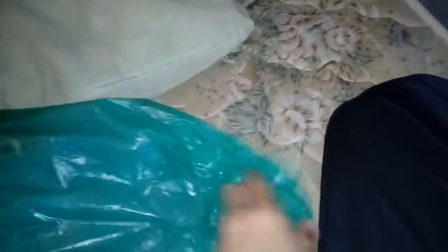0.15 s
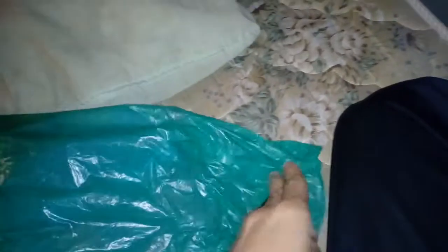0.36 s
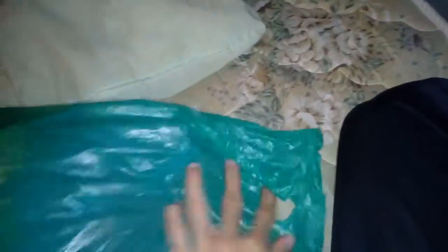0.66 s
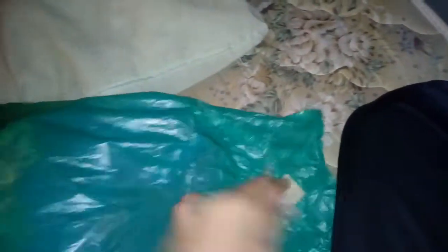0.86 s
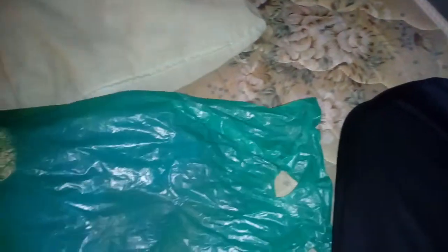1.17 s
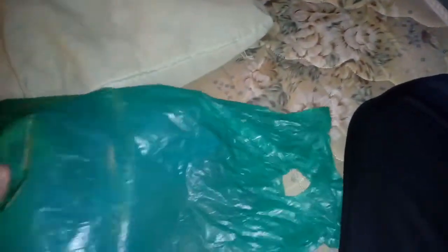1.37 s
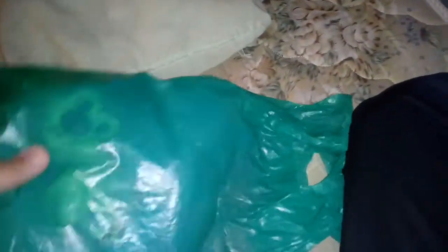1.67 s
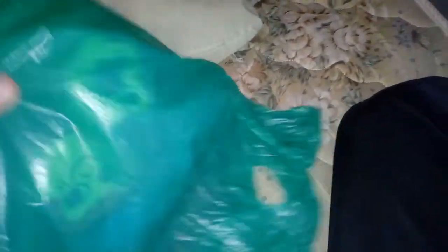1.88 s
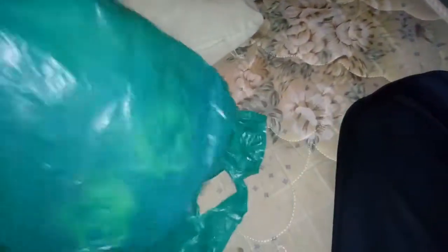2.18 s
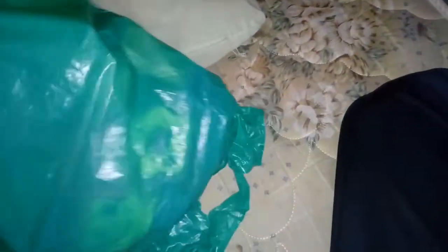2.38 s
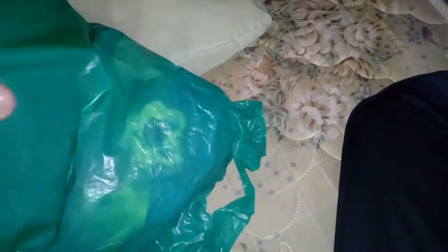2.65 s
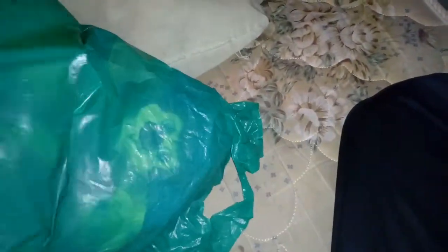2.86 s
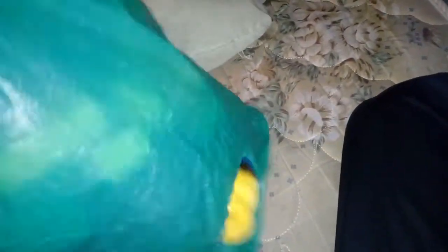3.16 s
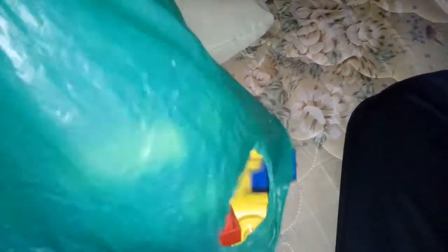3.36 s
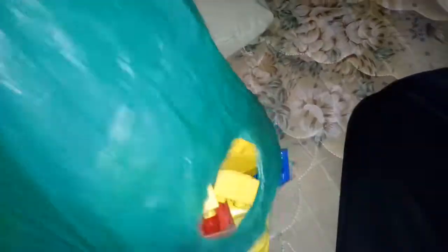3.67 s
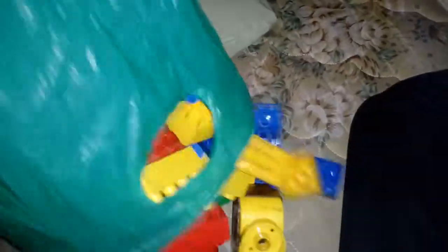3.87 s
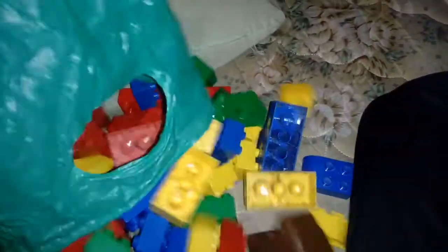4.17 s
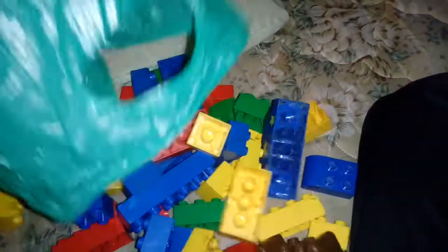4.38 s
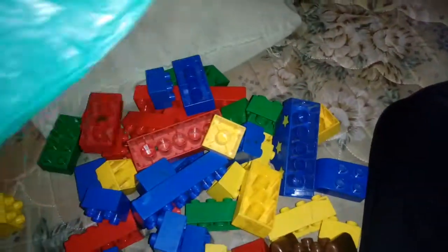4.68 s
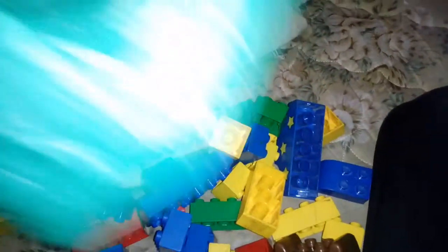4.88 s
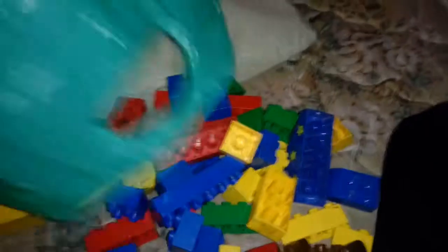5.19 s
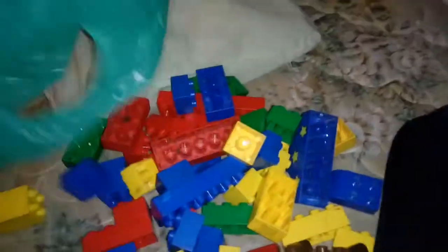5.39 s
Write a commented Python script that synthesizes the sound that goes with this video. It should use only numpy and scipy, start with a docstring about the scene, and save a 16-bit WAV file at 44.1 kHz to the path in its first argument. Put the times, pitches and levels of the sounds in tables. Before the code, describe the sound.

Very close, bright rattling of hollow plastic blocks in a rustling bag, swelling into a pouring rush before thinning to bag rustle and last sharp clacks.

```python
"""Hollow toy bricks clatter in a thin plastic bag handled on a bed, close to a phone microphone, in a small soft room.
Each brick is a set of damped wall modes, with lower ringing from the air in its open underside.
The film is filtered noise: crowds of tiny pops for crinkle, single bursts for snaps, low noise for drag on the cover.
Low background noise lies under everything, and a short decaying noise tail is the room.
The phone's limiter holds the clacks down, and the sharpest ones clip."""
import sys
import numpy as np
from scipy import signal
from scipy.fft import rfft, irfft
from scipy.io import wavfile
from scipy.ndimage import uniform_filter1d, minimum_filter1d

SR = 44100
rng = np.random.default_rng(int(sys.argv[2]) if len(sys.argv) > 2 else 0)


def int16_out(signal):
    """Quantize to a 16-bit WAV file."""
    q = np.round(np.clip(np.atleast_2d(signal).T, -1, 1) * 32767)
    wavfile.write(sys.argv[1], SR, q.astype(np.int16))


N = 244310
TIME = np.arange(N) / SR
RING = TIME[:int(.12 * SR)]  # time axis of one blow

# the load shifts and its bricks tumble, then settle:
# [start t/s, length/s, relative wall level/dB, hollows against walls/dB]
SHIFTS = [(0.0, 0.15, -20, -14), (0.198, 0.099, -15, -15), (0.366, 0.021, -23, -13),
          (0.491, 0.061, -17, -12), (0.596, 0.12, -20.5, -9.5), (0.923, 0.16, -24.5, -7),
          (1.261, 0.028, -18.5, -12), (1.31, 0.048, -19.5, 5), (1.355, 0.037, -13.5, -13),
          (1.418, 0.3, -15.5, -8), (1.743, 0.18, -22.5, -12), (1.884, .025, -17, -7),
          (1.911, 0.041, -9, -13), (2.002, .11, -9, -15.5), (2.13, .02, -11, -19),
          (2.167, 0.067, -11.5, -16), (2.266, .11, -15, -12), (2.396, 0.17, -18, -14.5),
          (2.568, 0.025, -22.5, -3.5), (2.647, 0.089, -17.5, -14.5), (2.779, 0.042, -20.5, -4),
          (2.84, .1, -26, -26), (2.96, 0.24, -12, -13), (3.227, 0.18, -11, -14), (3.428, 0.25, -14, -15.5),
          (3.703, .07, -16.5, -8), (3.752, 0.15, -11, -19.5), (3.928, 0.2, -11, -24.5),
          (4.129, 0.22, -15, -18.5), (4.375, 0.057, -15, -11), (4.48, 0.068, -20, -14),
          (4.576, 0.018, -18.5, -13), (4.64, 0.096, -42, -9), (4.975, 0.25, -27, -3),
          (5.306, 0.16, -26.5, -37), (5.502, 0.03, -21, -32)]
# bending modes of a brick's walls, before detuning: [f/Hz, level/dB, t60/s]
WALL_MODES = [(1854, 2, 0.018), (2135, -4, 0.072), (2521, -2, 0.063), (2754, -6.5, 0.046),
              (3032, -4.5, 0.07), (3417, -4.5, 0.051), (3768, -4.5, 0.045), (4285, -8, 0.034),
              (4477, -5, 0.063), (5010, -5.5, 0.06), (6100, -8, 0.014), (6030, -8, 0.026),
              (7030, -4.5, 0.024), (8230, -8.5, 0.052), (9100, -24, 0.012)]
# air ringing in the hollow undersides, before detuning: [f/Hz, level/dB, t60/s]
HOLLOW_MODES = [(798, -7, 0.031), (959, -7, 0.05), (1258.4, -4.5, 0.11), (1366, 0, 0.033)]
# colour of the tumbling heap: [f/Hz, level/dB]
HEAP_COLOUR = [(200, -43), (500, -63), (780, -28), (1100, -17.5), (1500, -10), (2200, -8.5), (3030, 2),
               (4000, -1), (4500, 0.5), (5500, -4.5), (6150, -3.5), (6700, -19), (8500, -15.5),
               (14000, -43.5)]
# small openings radiate little bass: [f/Hz, level/dB]
HOLLOW_COLOUR = [(150, -15), (450, -13), (750, -5), (1500, -9), (4000, 6)]
# hands and load pull at the bag: [start t/s, length/s, relative crinkle level/dB, relative drag level/dB]
PULLS = [(0.0, 0.039, -28, -38), (0.088, .16, -29, -38), (0.26, 0.088, -40, -40), (0.394, 0.1, -38, -43),
         (0.595, .04, -27.5, -40), (0.671, .13, -30, -39.5), (0.865, .2, -40, -44),
         (1.09, 0.13, -59, -46.5), (1.233, 0.15, -42, -39.5), (1.319, 0.45, -34.5, -39.5),
         (1.75, .21, -33, -47), (1.982, 0.26, -34.5, -66), (2.542, 0.083, -38, -47),
         (2.666, 0.094, -40.5, -44), (2.908, 0.055, -40, -45), (2.946, 0.078, -29.5, -37.5),
         (3.036, 0.27, -35.5, -48.5), (3.3, .1, -34, -61), (3.445, 0.29, -40, -51.5),
         (3.71, 0.051, -34.5, -42), (3.819, 0.46, -35.5, -79), (4.36, 0.35, -43.5, -54),
         (4.73, .09, -39.5, -49), (4.899, .05, -39.5, -50), (4.955, 0.11, -30.5, -40),
         (5.076, 0.077, -35, -38.5), (5.128, 0.12, -31, -41), (5.388, 0.052, -39, -54),
         (5.493, 0.044, -45, -52)]
# colour of the crinkling film: [f/Hz, level/dB]
FILM_COLOUR = [(200, -32), (500, -15), (900, -5.5), (1400, -6), (1900, 3.5), (3000, -0.5), (4800, 9.5),
               (5600, 3), (6600, -4.5), (9000, -7.5), (11000, -15.5), (13000, -36), (15500, -36)]
# colour of the bag dragged over the bed cover, shared by the background noise: [f/Hz, level/dB]
DRAG_COLOUR = [(20, -56), (42, -7), (65, -8.5), (115, 4.5), (165, -2), (200, 6), (290, -6), (450, -2.5),
               (800, 4.5), (2000, -33)]
# low background noise under everything, turned down by the phone during the loud clatter:
# [t/s, relative level/dB]
BACKGROUND_NOISE = [(1.3, -51), (2.0, -49), (4.1, -66.5), (4.9, -51)]
# single clacks that stand out of the clatter:
# [t/s, relative level/dB, main ring f/Hz, second ring f/Hz, share of the other modes/dB, t60 of both rings/s]
CLACKS = [(0.108, 3.5, 3020, 4500, -21, 0.027), (0.25, -4.5, 3030, 3970, -14, .023),
          (0.531, -2.5, 4860, 4430, -2, 0.035), (0.604, 3, 4960, 2510, 7, .026),
          (0.626, -1, 3420, 2620, -8, .029), (0.715, 0.5, 2460, 3270, -5, 0.016),
          (0.848, 4, 2600, 3540, -9.5, 0.02), (1.05, -5.5, 3010, 4000, -11, .028),
          (1.328, 4, 3120, 4560, -4, .03), (1.34, 2.5, 2860, 4340, 3, 0.055),
          (1.358, 2.5, 3120, 4220, -2, 0.034), (1.599, 1.5, 3220, 3600, 2, 0.03),
          (1.67, 4.5, 3690, 3070, 4, .028), (1.762, 7, 3510, 3720, -9.5, 0.02),
          (1.811, 0, 4346, 3130, -8, 0.048), (1.831, -4, 4330, 2960, -21, 0.021),
          (1.965, 0, 3080, 4480, -6, 0.041), (2.071, 3, 3070, 3570, -4, 0.025),
          (2.23, -1, 4440, 3300, -3, 0.042), (2.263, 2, 3100, 4570, 5, .026),
          (2.379, -10.5, 3320, 3680, -5, .023), (2.413, 4, 4530, 2720, -4, 0.022),
          (2.433, -3, 3340, 3640, -8, 0.015), (2.455, -2.5, 3440, 4960, -6, 0.036),
          (2.647, -2, 3700, 4840, 3, .026), (2.668, -4, 3410, 2620, -4, 0.036),
          (2.7868, 4.5, 2585, 2840, -5, .022), (2.818, -7, 2600, 3010, -1, 0.034),
          (2.862, 1, 4600, 3374, -0.5, 0.035), (3.146, 1, 3530, 4580, 1, 0.029),
          (3.167, 2.5, 3270, 4540, -13, 0.023), (3.221, 3, 4320, 4480, -28, 0.028),
          (3.352, 5.5, 3540, 3070, -1, 0.019), (3.546, -2, 3850, 5200, 10, .026),
          (3.76, 1, 5020, 4040, 13, 0.02), (3.922, 3.5, 3610, 3350, -2, .023),
          (4.036, -1.5, 4570, 3620, 7, 0.062), (4.101, 2.5, 2980, 4420, 6, 0.029),
          (4.242, 1.5, 3310, 4670, 11, 0.025), (4.405, -4.5, 3346, 3630, -1, 0.057),
          (4.512, 5, 3340, 3600, -12.5, .02), (4.532, -4.5, 4430, 3460, -21, 0.031),
          (4.774, -11.5, 2620, 4250, 6, 0.022), (5.2876, 10.5, 4860, 4410, -13.5, 0.0096),
          (5.305, -6, 3020, 4730, 0, .034), (5.3638, -4, 2960, 5230, 7, 0.023),
          (5.402, -9, 2890, 3360, -8, 0.058), (5.424, -0.5, 4390, 5980, 4, 0.055),
          (5.507, -4.5, 5960, 4350, -1, .018), (5.516, -4.5, 3460, 5930, -2, 0.048),
          (5.531, -3.5, 3720, 4370, -3, 0.025)]
# creases of the film snapping through: [t/s, relative level/dB]
SNAPS = [(0.1401, -13), (0.2296, -5), (0.4286, -7.5), (1.1798, -15), (1.244, -19), (2.6169, -2.5),
         (2.7345, -4.5), (3.27, -5), (4.12, -9), (4.33, -4), (4.634, -7.5), (4.724, -12.5), (4.7392, -16),
         (4.9406, -8), (5.0481, -1.5), (5.382, -9.5)]
# the load drops freely just before it lands: [landing t/s]
LANDINGS = [0.592, 2.647, 2.786, 5.288]
# a brick lands on its open underside and the hollow knocks: [t/s, peak level before the room/dB, main ring f/Hz]
KNOCKS = [(1.346, -15, 1304), (1.585, -11, 1290), (1.67, -20, 1264), (2.321, -13.5, 1284),
          (2.648, -26, 800), (4.17, -20.5, 1280), (4.353, -20.5, 1280), (4.406, -18, 812),
          (4.418, -19, 1266), (5.448, -22.5, 1230)]
# the phone lifts the top of its range: [f/Hz, level/dB]
TOP_LIFT = [(12500, 0), (13500, -6), (14600, 7.5), (15800, 4)]

# an avalanche builds up, runs on and settles; a few bricks always creep
SHIFT_RISE_S, SETTLE_DB_PER_S = .015, 273
CREEP_WALLS_DB, CREEP_HOLLOWS_DB = -41, -43
# the film tightens during a pull and then relaxes; it never lies quite still
PULL_RISE_S, RELAX_DB_PER_S = 0.0055, 349
RESTING_FILM_DB = -55
SECOND_RING_DB = -2.5  # against a clack's main ring
# the fade takes LIFT_OFF_S and is complete AIRBORNE_S before the landing
AIRBORNE_S, LIFT_OFF_S, AIRBORNE_DB = .014, 0.0063, -11.5
ROOM_T60_S, ROOM_DB = 0.2, -17
LIMIT_DB, LIMIT_RANGE_DB, LIMIT_HOLD_S = -0.57, 6, 0.0016
TOP_HZ = 15900  # upper edge of the phone's passband


def undb(db):
    """Decibels to gain."""
    return 10 ** (np.asarray(db) / 20)


def add(track, s, sound):
    """Mix a sound into the track from time s."""
    i = int(np.clip(s * SR, 0, N - 1))
    track[i:i + len(sound)] += sound[:N - i]


def colour(x, points):
    """Causal minimum-phase filter through (Hz, dB) points on a log frequency axis."""
    size = 2048
    hz, db = np.transpose(points)
    grid_hz = np.arange(size // 2 + 1) * SR / size + 1
    log_gain = np.log(undb(np.interp(np.log(grid_hz), np.log(hz), db)))
    # folding the cepstrum onto positive time makes the response causal
    cepstrum = irfft(log_gain)[:size // 2]
    folded = np.r_[cepstrum[0], 2 * cepstrum[1:]]
    response = irfft(np.exp(rfft(folded, size)))
    return signal.oaconvolve(x, response)[:len(x)]


def even(x, band, span_s):
    """Bring the running level inside a band (Hz) towards one, keeping the faster grain."""
    inside = signal.sosfilt(signal.butter(3, band, "band", fs=SR, output="sos"), x)
    size = int(span_s * SR) + 1
    power = np.abs(uniform_filter1d(uniform_filter1d(inside ** 2, size), size))
    floor = np.var(inside) / 10 ** 2  # limits the boost in gaps
    return x / np.sqrt(power + floor)


def swell(start, length, rise_s, fall_db_per_s):
    """Attack, hold, and a steady fall in dB once length has passed."""
    age = TIME - start
    fall = undb(-fall_db_per_s * np.maximum(age - length, 0))
    return np.clip(age / rise_s, 0, 1) * fall


def together(levels_db, shapes, rest_db):
    """Overlapping movements add in power, over a resting level."""
    return np.sqrt(undb(levels_db) ** 2 @ np.square(shapes) + undb(rest_db) ** 2)


def burst(t60, length):
    """Noise that dies away."""
    return rng.standard_normal(length) * np.exp(-np.log(1000) * TIME[:length] / t60)


def ring(hz, t60):
    """One damped mode."""
    return np.sin(2 * np.pi * hz * RING) * np.exp(-np.log(1000) * RING / t60)


def brick(modes, spread):
    """The modes of one brick, a row each; no two bricks are tuned quite alike."""
    detune = np.exp(spread * rng.standard_normal(len(modes)))
    return np.array([undb(db) * ring(hz * d, t60) for (hz, db, t60), d in zip(modes, detune)])


def collisions(modes, spread, scatter_db, crack, count, size, rebound=0.71):
    """Random blows (size of them) on each of count bricks; the spot that is hit sets the mix of modes."""
    out = np.zeros(N)
    for _ in range(count):
        shapes = np.vstack([brick(modes, spread), crack * burst(0.036, len(RING))])
        mix = rng.standard_normal((size, len(shapes)))
        blows = mix / np.linalg.norm(mix, axis=1, keepdims=True) @ shapes
        force = undb(scatter_db * np.minimum(rng.standard_normal(size), 1.6))
        starts = rng.random(size) * N / SR
        hops = rng.uniform(.004, .025, size)
        for s, hop, f, blow in zip(starts, hops, force, blows):
            add(out, s, f * blow)
            # the brick hops and lands again, more softly
            add(out, s + hop, rebound * f * blow)
    return out


def tumbling():
    """Many bricks knock together at each shift of the load: their walls clatter and their hollows ring lower."""
    starts, lengths, wall_db, share_db = np.transpose(SHIFTS)
    shapes = [swell(s, length, SHIFT_RISE_S, SETTLE_DB_PER_S) for s, length in zip(starts, lengths)]
    wall_gain = together(wall_db, shapes, CREEP_WALLS_DB)
    hollow_gain = together(wall_db + share_db, shapes, CREEP_HOLLOWS_DB)
    walls = collisions(WALL_MODES, spread=0.0365, scatter_db=3, crack=1.17, count=70, size=17)
    walls = even(colour(walls, HEAP_COLOUR), band=(2400, 3800), span_s=.024)
    hollows = collisions(HOLLOW_MODES, spread=0.045, scatter_db=5.0, crack=0, count=30, size=16)
    hollows = even(colour(hollows, HOLLOW_COLOUR), band=(700, 1400), span_s=0.011)
    return undb(-3.5) * wall_gain * walls + undb(-5.5) * hollow_gain * hollows


def crinkling(scatter_db=4, pop_t60=0.016, count=16, size=900):
    """Countless tiny creases buckle, most of them faint, each kind with its own short ring."""
    out = np.zeros(N)
    for _ in range(count):
        force = undb(scatter_db * np.minimum(rng.exponential(size=size), 5))
        force = force * rng.choice([-1, 1], size)  # creases buckle either way
        pops = np.bincount(rng.integers(0, N, size), force, N)
        out += signal.oaconvolve(pops, burst(pop_t60, len(RING) // 10))[:N]
    return colour(out, FILM_COLOUR)


def bag_and_background():
    """At each pull the film crinkles and the bag drags softly over the cover, above low background noise."""
    starts, lengths, crinkle_db, drag_db = np.transpose(PULLS)
    shapes = [swell(s, length, PULL_RISE_S, RELAX_DB_PER_S) for s, length in zip(starts, lengths)]
    crinkle_gain = together(crinkle_db, shapes, RESTING_FILM_DB)
    background_db = np.interp(TIME, *np.transpose(BACKGROUND_NOISE))
    low_gain = together(drag_db, shapes, background_db)
    film = even(crinkling(), band=(8000, 12000), span_s=0.034)
    # one low noise serves both the drag and the background
    low_noise = colour(rng.standard_normal(N), DRAG_COLOUR)
    low_noise = even(low_noise, band=(100, 450), span_s=0.018)
    return undb(-5.0) * crinkle_gain * film + undb(-6.0) * low_gain * low_noise


def clacks(crack_db=-10, crack_t60=0.033, body_db=-13, hollow_db=-31, contact_s=0.00052, bounce=0.19, lift_db=1):
    """Hard single blows: a crack of contact, two strong wall modes, the rest of the brick and its hollow."""
    out = np.zeros(N)
    push = 1 - np.exp(-RING / contact_s)
    for s, db, main_hz, second_hz, others_db, t60 in CLACKS:
        walls = ring(main_hz, t60) + undb(SECOND_RING_DB) * ring(second_hz, t60)
        body = rng.choice([-1, 1], len(WALL_MODES)) @ brick(WALL_MODES, 0.0408)
        body = colour(body, HEAP_COLOUR)
        crack = colour(burst(crack_t60, len(RING)), HEAP_COLOUR)
        crack = crack / np.std(crack[:SR // 200])  # level set over its first 5 ms
        rest = undb(body_db) * body + undb(crack_db) * crack
        # a second corner lands a few milliseconds after the first
        rest = rest + bounce * np.roll(rest, int(rng.uniform(0.0043, 0.011) * SR))
        hollow = colour(brick(HOLLOW_MODES, 0.033).sum(axis=0), HOLLOW_COLOUR)
        shell = push * (walls + undb(others_db) * rest)
        blow = shell / np.abs(shell).max() + undb(hollow_db) * push * hollow
        add(out, s, undb(db + lift_db) * blow)
    return out


def snaps(t60=0.034, lift_db=-1):
    """Big creases flip over with a dry snap, a short burst in the film's colour."""
    out = np.zeros(N)
    for s, db in SNAPS:
        snap = colour(burst(t60, len(RING)), FILM_COLOUR)
        add(out, s, undb(db + lift_db) * snap / np.abs(snap).max())
    return out


def contact():
    """Gain of tumbling, bag and background: it fades while the load is in the air and returns as it lands."""
    airborne = np.zeros(N)
    for s in LANDINGS:
        fade = np.clip((TIME - s + AIRBORNE_S) / LIFT_OFF_S + 1, 0, 1)
        airborne += fade * (TIME < s)
    return uniform_filter1d(undb(AIRBORNE_DB * airborne), size=44)  # smoothed over 1 ms


def knocks(contact_s=0.0018, t60=0.077, others_db=-9):
    """Softer landings that ring only the air under the brick, one of its modes most."""
    out = np.zeros(N)
    for s, db, hz in KNOCKS:
        air = ring(hz, t60) + undb(others_db) * brick(HOLLOW_MODES, 0.01).sum(axis=0)
        hollow = (1 - np.exp(-RING / contact_s)) * air
        add(out, s, undb(db) * hollow / np.abs(hollow).max())
    return out


def room(x):
    """A short tail from a furnished bedroom, after the first wall's delay."""
    tail = burst(ROOM_T60_S, SR // 2) * (TIME[:SR // 2] > .005)
    tail = tail / np.linalg.norm(tail)
    return x + undb(ROOM_DB) * signal.oaconvolve(x, tail)[:N]


def scene():
    """Bag and bricks in the room, one microphone channel."""
    moving = contact() * (tumbling() + bag_and_background())
    return room(moving + clacks() + knocks() + snaps())[None]


def record(dry):
    """A fast limiter holds the peaks down; a blow beyond its range clips; the very top is lifted, then cut."""
    size = int(LIMIT_HOLD_S * SR) + 1
    wanted = np.clip(undb(LIMIT_DB) / (np.abs(dry) + 1e-9), undb(-abs(LIMIT_RANGE_DB)), 1)
    gain = uniform_filter1d(minimum_filter1d(wanted, size), size)
    clipped = np.clip(dry * gain, -1, 1)
    bright = colour(clipped[0], TOP_LIFT)[None]
    return signal.sosfilt(signal.ellip(10, .2, 80, TOP_HZ, fs=SR, output="sos"), bright)


dry = scene()
out = record(dry)
int16_out(out)
```